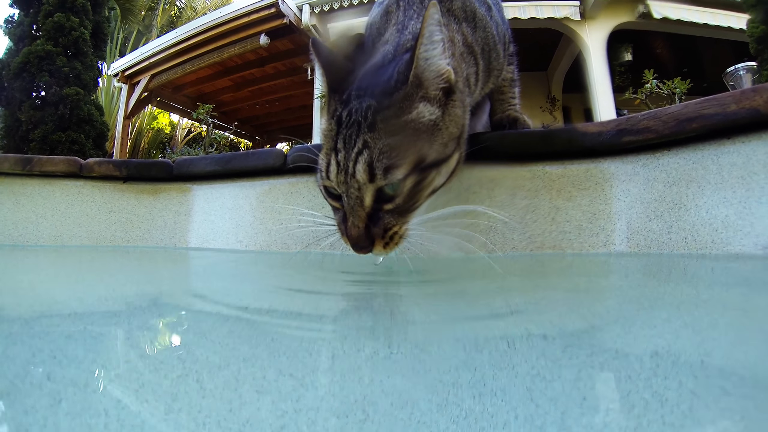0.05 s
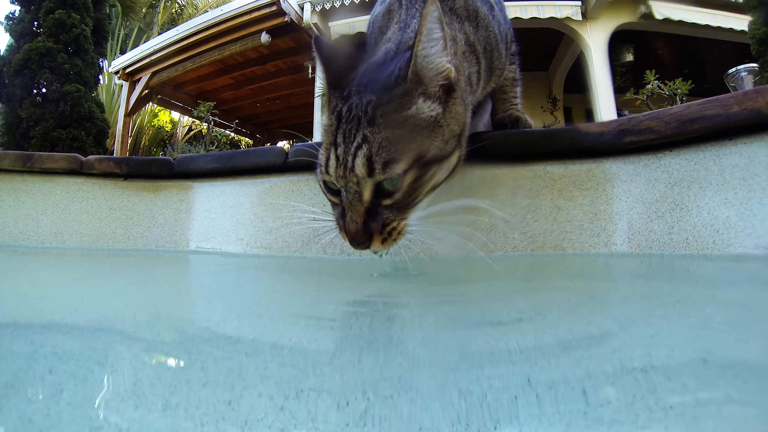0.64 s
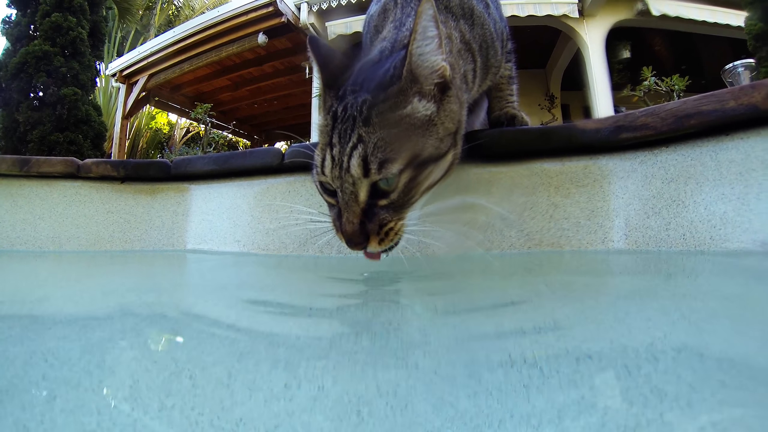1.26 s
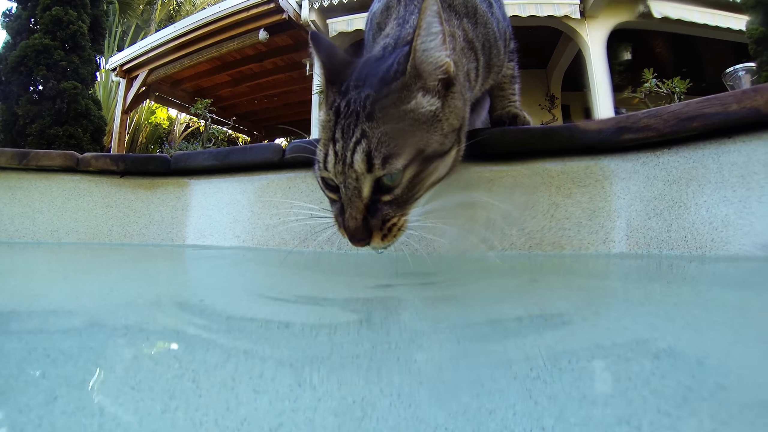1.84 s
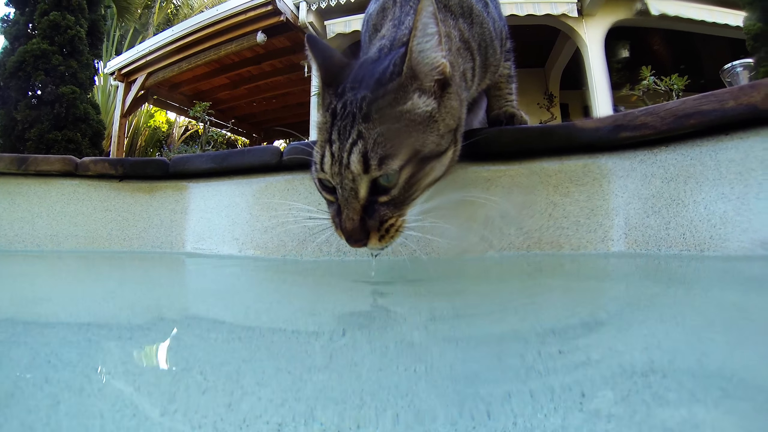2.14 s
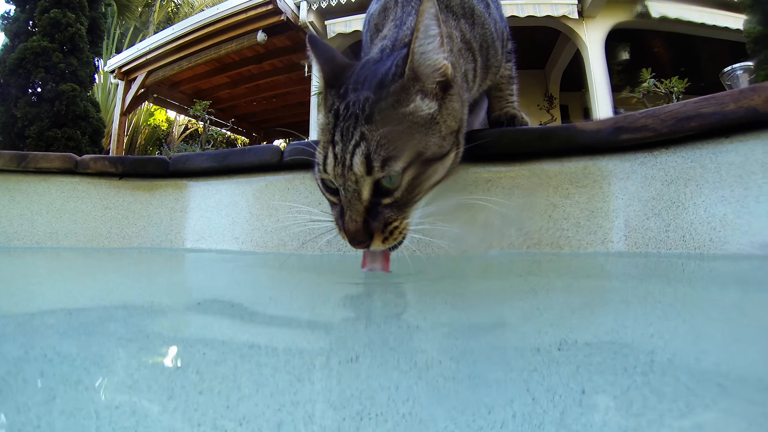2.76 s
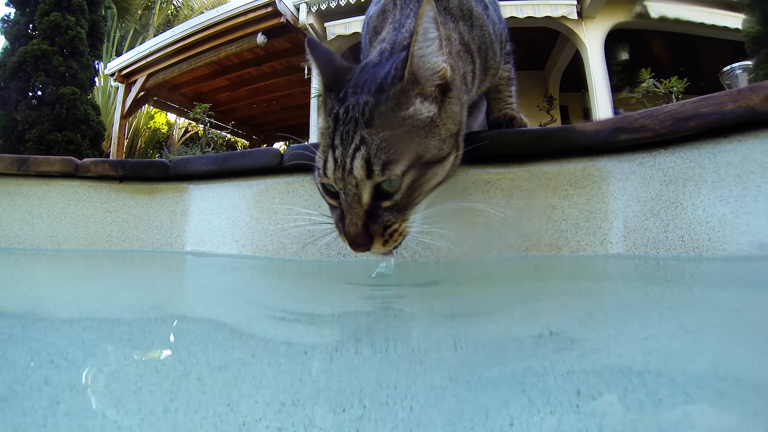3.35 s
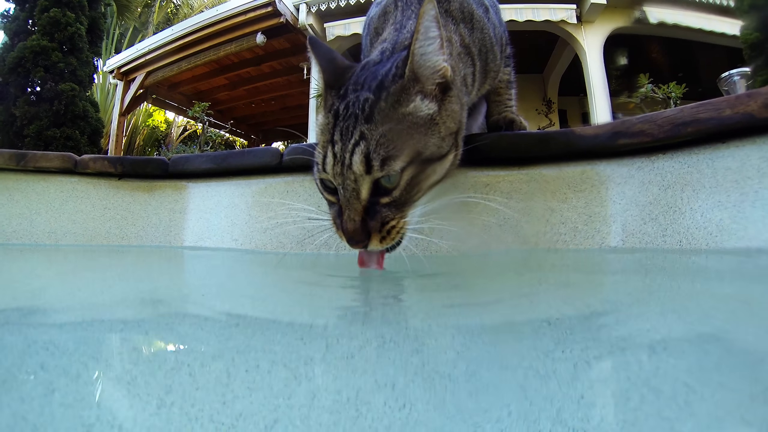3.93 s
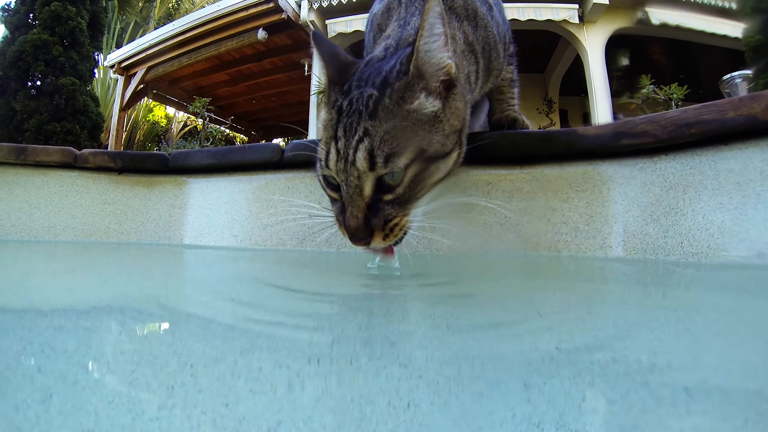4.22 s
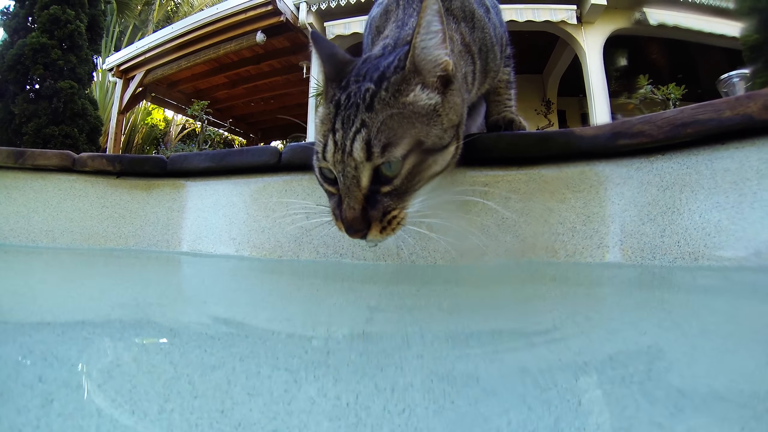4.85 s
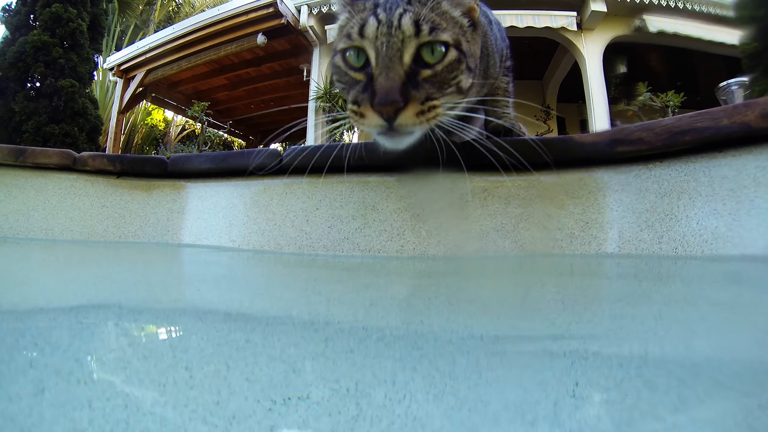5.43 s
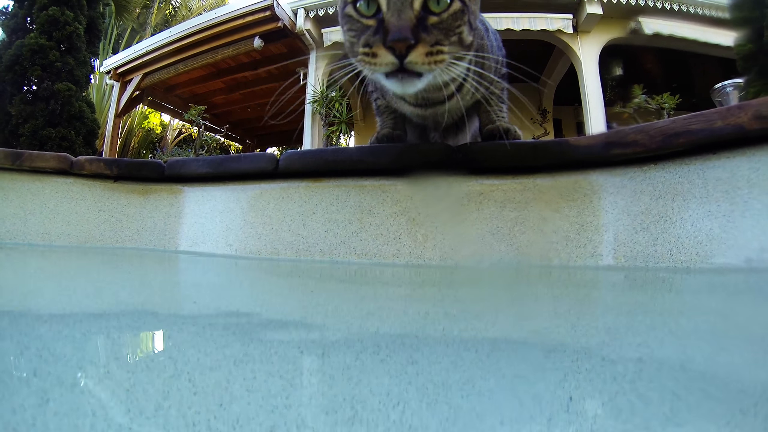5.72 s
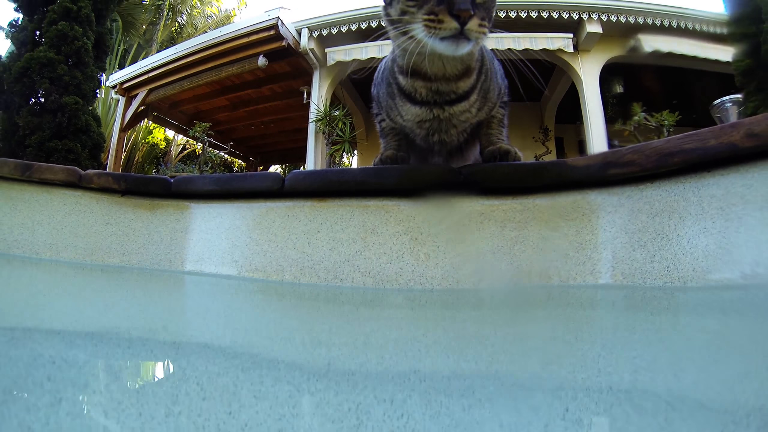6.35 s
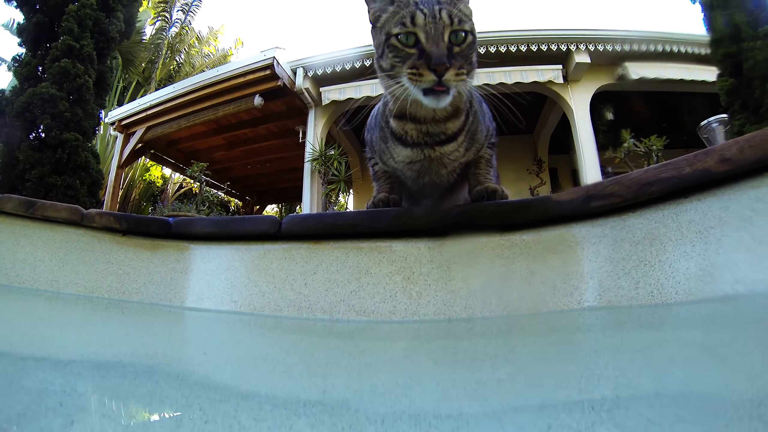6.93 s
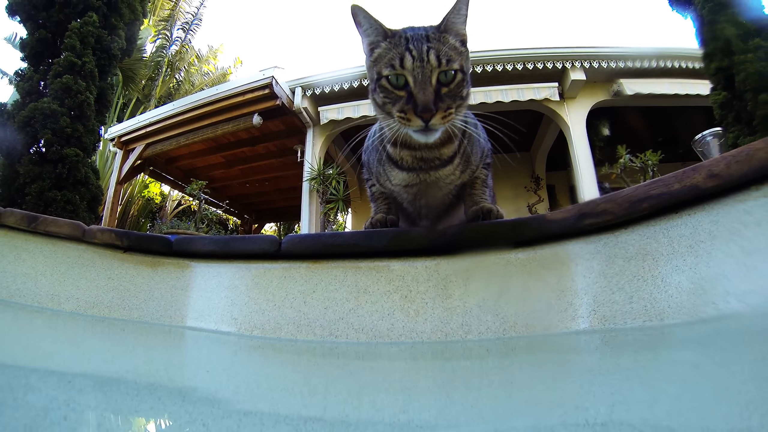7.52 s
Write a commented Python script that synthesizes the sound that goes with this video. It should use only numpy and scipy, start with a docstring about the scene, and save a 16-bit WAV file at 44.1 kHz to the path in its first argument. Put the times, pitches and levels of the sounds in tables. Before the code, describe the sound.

A cat laps water quietly with small wet clicks over a steady outdoor hush, followed by low microphone handling rumble and soft knocks.

```python
"""Cat lapping at a pool

A cat laps quietly, close to a hand-held camera just above the water. Each lap is a small wet click in
the mouth, answered by the pool walls; a few plops and thin ticks go with it. Under them lie a steady
outdoor hush, microphone hiss and a handling rumble that grows, with a few hollow knocks, as the
camera tilts up after the cat."""
import sys
import numpy as np
from scipy import signal
from scipy.fft import rfft, irfft, next_fast_len
from scipy.io import wavfile
from scipy.ndimage import map_coordinates

SR = 44100
rng = np.random.default_rng(int(sys.argv[2]) if len(sys.argv) > 2 else 0)


def bounce(signal):
    """Save signal as a 16-bit WAV file at the path given by the first command-line argument."""
    frames = np.transpose(np.atleast_2d(signal))
    limited = np.clip(frames, -1, 1)
    pcm = np.round(limited * 32767).astype(np.int16)
    wavfile.write(sys.argv[1], SR, pcm)


N = 338688


def amp(db):
    """Decibels to gain."""
    return 10 ** (np.asarray(db) / 20)


def unit(x):
    """x at rms 1."""
    return x / np.sqrt(np.mean(x ** 2) + 1e-20)


def crest(x):
    """x at peak 1."""
    return x / np.abs(x).max()


def wobble(rate):
    """A smooth random curve, rate knots a second."""
    knots = rng.standard_normal(int(N * rate / SR) + 4)
    return map_coordinates(knots, [np.arange(N) * rate / SR])


def filtered(x, response):
    """x shaped by a response, given as a function of frequency in Hz."""
    size = next_fast_len(2 * len(x))
    return irfft(rfft(x, size) * response(np.fft.rfftfreq(size, 1 / SR)), size)[:len(x)]


def noise(spectrum):
    """Noise of rms 1, coloured by (freq_hz, gain_db) points on a log axis."""
    freq_hz, gain_db = np.transpose(spectrum)
    white = rng.standard_normal(N)
    return unit(filtered(white, lambda hz: amp(np.interp(np.log(hz + 1), np.log(freq_hz), gain_db))))


def ring(x, modes):
    """x through steep two-stage resonances (pitch_hz, width_hz, gain_db), at peak 1."""
    def stage(f, hz, width):
        return 1j * f * width / (hz * hz - f * f + 1j * f * width)
    return crest(filtered(x, lambda f: sum(amp(db) * stage(f, hz, width) ** 2 for hz, width, db in modes)))


def add(track, start_s, db, sound):
    """Lay a sound into the track; db is its rms level, were it spread over 10 ms."""
    part = track[max(round(start_s * SR), 0):][:len(sound)]
    part += (amp(db) * sound * np.sqrt(SR / 100) / np.linalg.norm(sound))[:len(part)]


def outdoor_hush(level_db=-65, drift_db=0.26):
    """A steady bed of open air whose level barely drifts."""
    # colour of the air: freq_hz, gain_db
    air_spectrum = [(60, -34), (150, 4.5), (200, 0.5), (270, -2), (340, -1), (420, 1), (490, -5), (750, -6),
                    (1150, -11), (1800, -12.5), (2300, -16), (2950, -13.5), (3800, -20.5), (14000, -43)]
    return amp(level_db - drift_db * wobble(rate=4.7)) * noise(air_spectrum)


def microphone_hiss(hiss_db=-74, whine_hz=9088, whine_db=-97):
    """The hiss and thin whine of the camera's electronics."""
    # colour of the hiss: freq_hz, gain_db
    hiss_spectrum = [(500, 4), (4500, 4.5), (7000, 1.5), (9200, -1.5), (9900, 2.5), (10600, -2),
                     (11800, -4.5), (13500, -0.5), (15200, -6)]
    whine = np.sqrt(2) * np.sin(2 * np.pi * whine_hz * np.arange(N) / SR)
    return amp(hiss_db) * noise(hiss_spectrum) + amp(whine_db) * whine


def handling_rumble(sway_boost_db=3.5, tremor_db=1.5, drone_db=-62.5,
                    tilt_start_s=5.2, tilt_rise_s=1.66, tilt_boost_db=9.5):
    """The hand sways the camera, whose housing drones near 100 Hz, louder the faster it tilts."""
    # unsteadiness of the hand, before the sway boost: time_s, level_db
    unsteadiness = [(0, -52.5), (1.1, -54), (1.5, -49), (2.0, -48.5), (2.6, -53), (3.75, -47.5),
                    (4.1, -48.5), (5.2, -54), (5.65, -43.5), (6.0, -47.5), (7.68, -46.5)]
    # sub-bass colour of the sway: freq_hz, gain_db
    sway_spectrum = [(8, -6.5), (16, 7.5), (25, 0), (42, -5), (55, -8.5), (80, -17.5), (130, -28),
                     (250, -39), (600, -88)]
    # colour of the housing's drone: freq_hz, gain_db
    housing_spectrum = [(45, -32), (70, -2.5), (88, -3.5), (106, 2), (122, -2.5), (140, -14), (175, -32),
                        (300, -29), (700, -62)]
    t = np.arange(N) / SR
    unsteady_db = np.interp(t, *np.transpose(unsteadiness))
    tilt_speed = np.clip((t - tilt_start_s) / tilt_rise_s, 0, 1)
    grip_db = tremor_db * wobble(rate=7)
    sway = amp(unsteady_db + sway_boost_db + grip_db) * noise(sway_spectrum)
    drone = amp(drone_db + tilt_boost_db * tilt_speed + grip_db) * noise(housing_spectrum)
    return sway + drone


def hand_bumps(width_cycles=0.91):
    """The hand bumps the camera softly: a few low cycles swell and fade."""
    # soft bumps: peak_s, level_db, pitch_hz
    bumps = [(1.298, -38, 52), (3.470, -43, 94), (3.476, -43, 44), (5.535, -37, 32.6), (5.660, -38, 34),
             (6.150, -61, 200), (6.224, -44, 92), (6.266, -45, 90), (6.487, -55, 170), (6.508, -38, 48),
             (6.512, -41, 92), (6.566, -44, 95), (6.612, -39, 50), (6.724, -42, 90), (6.791, -44, 95),
             (6.868, -60, 240), (6.910, -45, 88), (7.130, -36, 52), (7.137, -37, 90), (7.192, -44, 98),
             (7.288, -45, 98), (7.379, -41.5, 96), (7.468, -42, 96), (7.506, -42.5, 90),
             (7.508, -58.5, 230), (7.578, -39, 42), (7.622, -39.5, 97)]
    out, t = np.zeros(N), np.arange(SR // 4) / SR
    for peak_s, db, hz in bumps:
        cycles = (t - t.mean()) * hz
        thump = np.sin(2 * np.pi * cycles) * np.exp(-(cycles / width_cycles) ** 2)
        add(out, peak_s - t.mean(), db, thump)
    return out


def finger_knocks(contact_s=0.002, rub=0.098, width_ratio=0.23, reach_hz=150):
    """Soft fingers shift on the camera: each short, dull, rubbing knock rings the hollow case."""
    # knocks, each with a tone of its own: start_s, level_db, pitch_hz, tone_over_case_db
    knocks = [(6.471, -59, 580, -4), (6.489, -58, 540, -6), (6.562, -64, 350, 0), (6.612, -63, 260, 0),
              (6.687, -67, 840, 2), (6.7555, -57.5, 830, -0.5), (6.859, -60.5, 280, -2),
              (6.866, -58, 430, -3), (7.120, -61, 320, -1), (7.462, -63, 420, 3), (7.5035, -59, 270, 0),
              (7.517, -63, 870, 1), (7.616, -63, 400, 2)]
    # resonances of the case: pitch_hz, width_hz, gain_db
    case_modes = [(260, 160, -2), (430, 170, 0), (660, 420, -5)]
    out, t = np.zeros(N), np.arange(SR // 10) / SR
    for start_s, db, hz, tone_db in knocks:
        blow = (t == 0) + rub * rng.standard_normal(len(t)) * np.exp(-t / contact_s)
        case = unit(ring(blow, case_modes))
        tone = amp(tone_db) * unit(ring(blow, [(hz, width_ratio * hz, 0)]))
        lowpass = signal.butter(N=4, Wn=hz + reach_hz, fs=SR, output="sos")
        add(out, start_s, db, signal.sosfilt(lowpass, case + tone))
    return out


def fine_crackle(low_hz=6000, high_hz=10300, width_hz=1700, t60_s=0.026, spread_db=4.0):
    """Very faint, high ticks, scattered at random through each spell."""
    # spells of crackle: start_s, end_s, ticks_per_s, level_db
    spells = [(0, 7.5, 4, -84), (1.32, 1.5, 60, -83), (3.7, 3.9, 50, -83.5), (4.1, 4.2, 70, -82.5),
              (5.2, 5.9, 20, -83), (7.15, 7.68, 90, -84)]
    out, t = np.zeros(N), np.arange(SR // 50) / SR
    for start_s, end_s, rate, db in spells:
        span_s = end_s - start_s
        for place, height in rng.random((round(rate * span_s), 2)):
            burst = rng.standard_normal(len(t)) * amp(-60 * t / t60_s)
            tick = ring(burst, [(low_hz + height * (high_hz - low_hz), width_hz, 0)])
            add(out, start_s + place * span_s, db + spread_db * rng.standard_normal(), tick)
    return out


def thin_ticks(rise_s=0.0012, tone_width_hz=900):
    """Each tick is a tiny burst of crackle in a few high resonances."""
    # ticks, each with a tone of its own: start_s, level_db, pitch_hz, tone_over_shared_db
    ticks = [(.801, -76.5, 9700, 4), (1.337, -76, 7800, 4), (1.384, -75, 4650, -1), (1.398, -78, 9900, 4),
             (1.4528, -70, 9700, 8), (2.128, -78, 7600, 4), (2.144, -77, 7900, 4), (2.265, -77, 11100, 8),
             (4.0398, -68.5, 10000, 2), (4.050, -76, 5700, -1), (4.138, -77, 7300, -1),
             (5.225, -78, 7800, -1), (5.383, -75, 7400, -1), (5.436, -78, 7700, -1), (5.505, -77, 10800, 4),
             (5.750, -77, 9600, 6), (6.972, -78, 7300, -1), (7.196, -76, 9650, -1), (7.260, -78, 6400, -1),
             (7.2803, -70.5, 4850, -3), (7.2903, -69.5, 4800, -3), (7.358, -78, 9650, 6),
             (7.426, -71.5, 4750, -1), (7.6205, -71, 9700, 4), (7.651, -77, 7250, -1)]
    # resonances shared by all ticks: pitch_hz, width_hz, gain_db
    shared_modes = [(4510, 490, 9.5), (7900, 5200, -9), (9500, 610, -13)]
    out, t = np.zeros(N), np.arange(SR // 20) / SR
    for start_s, db, hz, tone_db in ticks:
        burst = rng.standard_normal(len(t)) * t * np.exp(-t / rise_s)
        tone = amp(tone_db) * ring(burst, [(hz, tone_width_hz, 0)])
        add(out, start_s, db, ring(burst, shared_modes) + tone)
    return out


def plops(ring_cycles=27, pitch_rise=0.033, attack_s=0.00078, slosh_t60_s=0.045):
    """A small air pocket rings briefly, rising in pitch, over a dull slosh."""
    # small glugs of water: start_s, level_db, pitch_hz, slosh_over_bubble_db
    glugs = [(.418, -66, 400, 0), (.4215, -68, 760, -2), (1.357, -68, 1030, -3), (1.900, -64, 860, 2),
             (2.768, -63, 700, 1), (2.779, -61, 590, 2), (4.1398, -63, 1010, -8), (4.648, -64.5, 410, -2),
             (4.648, -68.5, 1600, -6)]
    # resonances of the slosh: pitch_hz, width_hz, gain_db
    slosh_modes = [(323, 450, 12), (500, 190, -7), (755, 400, -6)]
    out, t = np.zeros(N), np.arange(SR // 10) / SR
    for start_s, db, hz, slosh_db in glugs:
        age = t * hz / ring_cycles  # 1 when the bubble has faded by 60 dB
        phase = 2 * np.pi * np.cumsum(hz * (1 + pitch_rise * age)) / SR
        bubble = crest(np.sin(phase) * amp(-60 * age) * (1 - np.exp(-t / attack_s)))
        slosh = ring(rng.standard_normal(len(t)) * amp(-60 * t / slosh_t60_s), slosh_modes)
        add(out, start_s, db, bubble + amp(slosh_db) * slosh)
    return out


def pool_walls(x, delay_spread=0.0076):
    """The pool walls return quick echoes, whose delays shift a little as the head moves."""
    # wall echoes: delay_s, gain_db
    echoes = [(.00354, -10), (.0107, -12)]
    shift = np.exp(delay_spread * rng.standard_normal())
    def reflections(hz):
        return sum(amp(db) * np.exp(-2j * np.pi * hz * delay_s * shift) for delay_s, db in echoes)
    return x + filtered(x, reflections)


def wet_contact(drive, modes, cutoff_hz=3100, order=12):
    """A resonant touch of the soft, wet tongue: it loses its treble steeply and echoes off the walls."""
    softened = filtered(ring(drive, modes), lambda hz: 1 / np.sqrt(1 + (hz / cutoff_hz) ** (2 * order)))
    return pool_walls(softened)


def laps(trim_db=-1, film=0.14, film_t60_s=0.045, gape_spread=0.013, ping_width_hz=330,
         throat_hz=420, throat_db=-12, peel_lead_s=0.0089, peel_db=-12,
         closing_lag_s=0.0039, closing_hz=1800, closing_width_hz=900):
    """The tongue peels off the water and snaps free, a droplet pings, and the water smacks shut."""
    # tongue clicks, before the trim: snap_s, level_db, ping_hz, ping_over_smack_db, closing_offset_db
    clicks = [(.168, -71, 2100, -6, -10), (.4218, -63, 2950, 7, -18), (.7998, -65.3, 2100, -5, -12),
              (1.040, -69.5, 1700, -8, -8), (1.349, -70, 1750, -8, -8), (1.591, -65, 2400, -7, -6),
              (1.845, -68.3, 2600, -1, -12), (2.2465, -64.5, 1700, 6, -5), (2.513, -69.5, 2050, -8, -8),
              (2.786, -64, 2100, -5, -12), (3.048, -63.7, 2950, -8, -8), (3.321, -64.8, 2800, -7, -7),
              (3.576, -65, 2900, -9, -5), (3.956, -61.3, 2700, -2, -3), (4.2078, -61.5, 2900, -11, -5),
              (4.462, -65, 1580, 1, -12), (4.6476, -64.5, 3440, 1.5, -20)]
    # resonances of the mouth: pitch_hz, width_hz, gain_db
    mouth_modes = [(1680, 380, -4), (1955, 320, -1), (2850, 2400, -6)]
    out, t = np.zeros(N), np.arange(SR // 10) / SR
    snap = 1. * (t == 0)
    throat = amp(throat_db) * unit(ring(snap, [(throat_hz, throat_hz / 2, 0)]))
    for snap_s, db, ping_hz, ping_db, closing_db in clicks:
        # the mouth opens a little differently on each lap, which retunes it
        mouth = np.array(mouth_modes) * [np.exp(gape_spread * rng.standard_normal()), 1, 1]
        # the wet film on the tongue crackles away
        peel, crackle, splash = film * rng.standard_normal((3, len(t))) * amp(-60 * t / film_t60_s)
        smack = unit(wet_contact(snap + film * crackle, mouth))
        ping = amp(ping_db) * unit(ring(snap, [(ping_hz, ping_width_hz, 0)]))
        add(out, snap_s - peel_lead_s, db + peel_db - max(ping_db, 0), wet_contact(peel, mouth))
        add(out, snap_s, db + trim_db, smack + ping + throat)
        closing = wet_contact(snap + splash, [(closing_hz, closing_width_hz, 0)])
        add(out, snap_s + closing_lag_s, db + closing_db, closing)
    return out


def scene():
    """Everything as it reaches the single microphone."""
    drinking = laps() + plops() + thin_ticks() + fine_crackle()
    handling = finger_knocks() + hand_bumps() + handling_rumble()
    return (drinking + handling + outdoor_hush() + microphone_hiss())[None]


def record(dry):
    """The camera keeps nothing above its band limit."""
    top_hz = 15300
    return np.array([filtered(channel, lambda hz: hz < top_hz) for channel in dry])


dry = scene()
out = record(dry)
bounce(out)
```